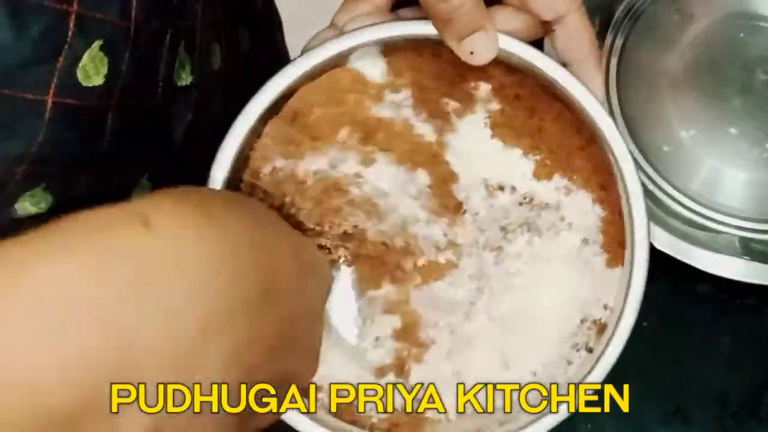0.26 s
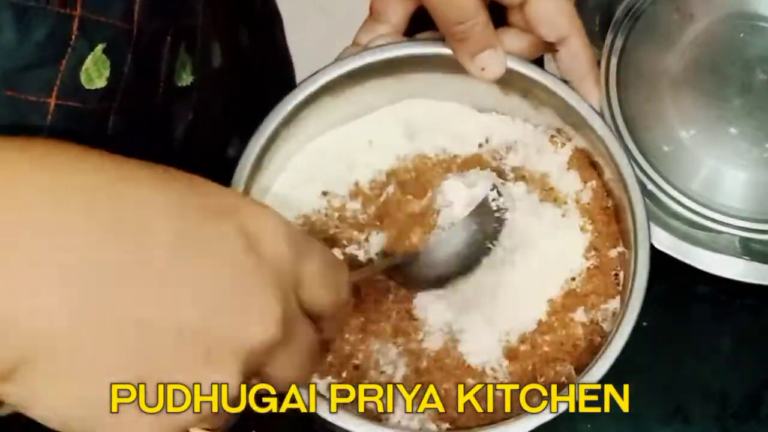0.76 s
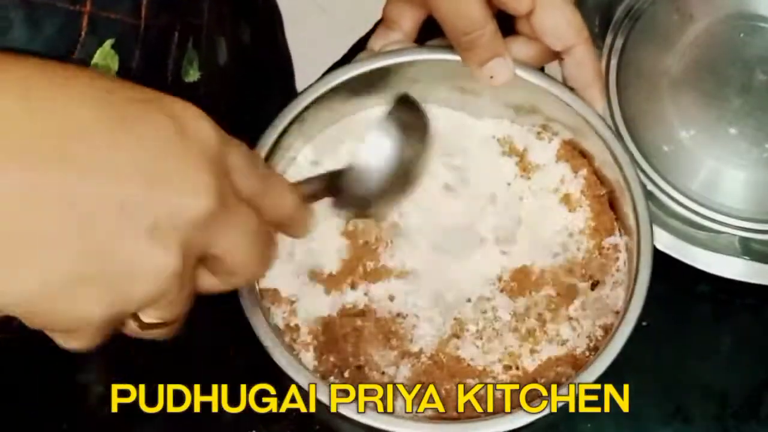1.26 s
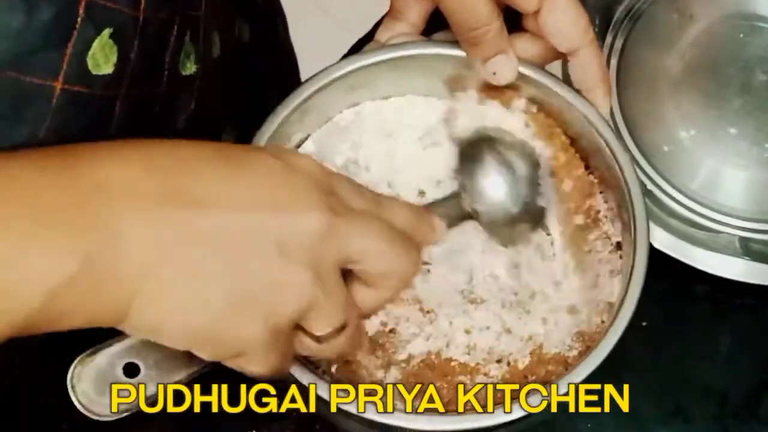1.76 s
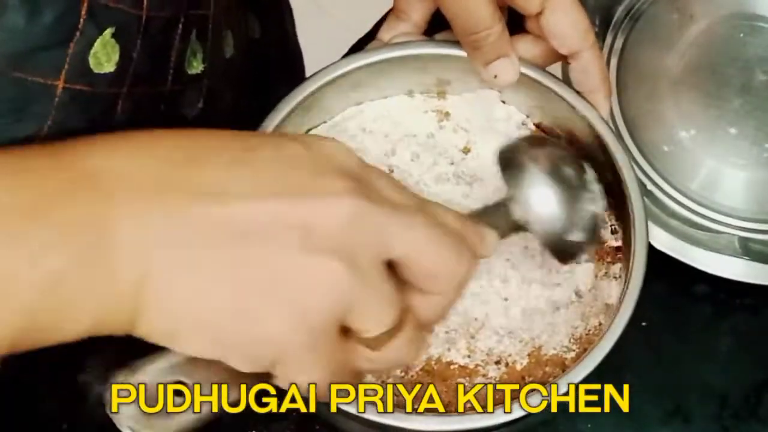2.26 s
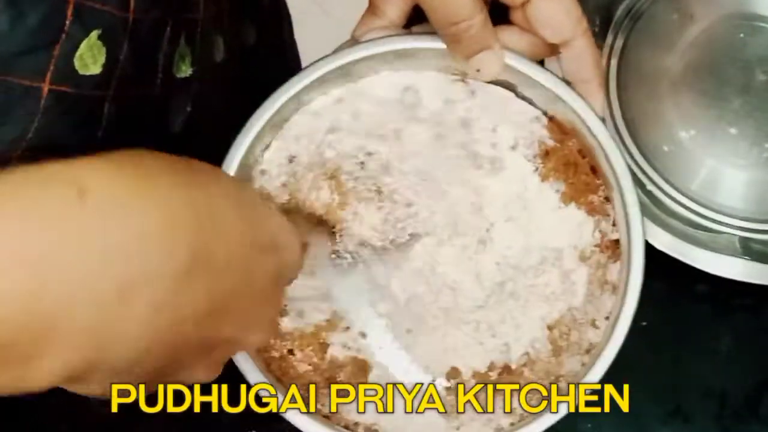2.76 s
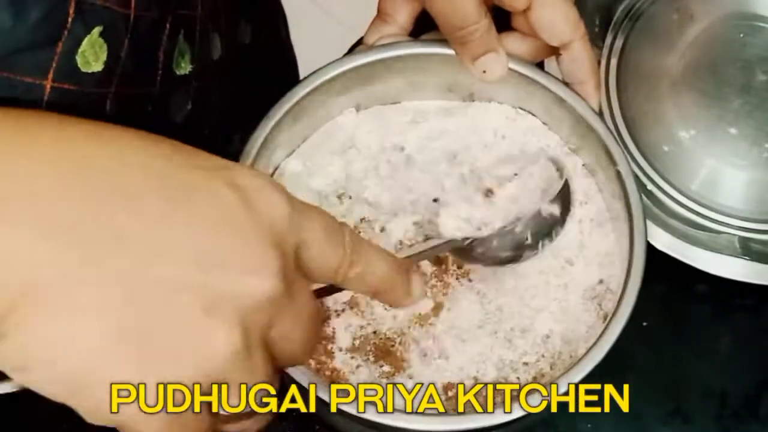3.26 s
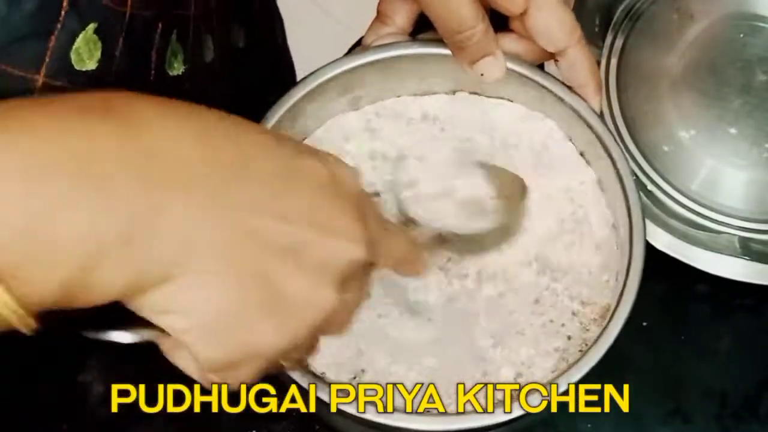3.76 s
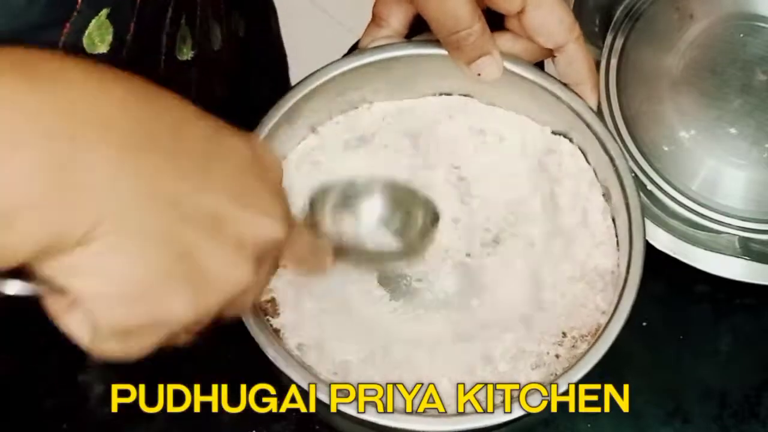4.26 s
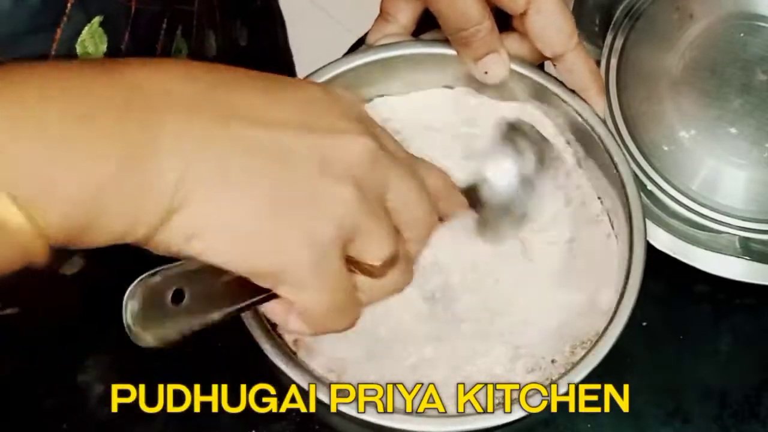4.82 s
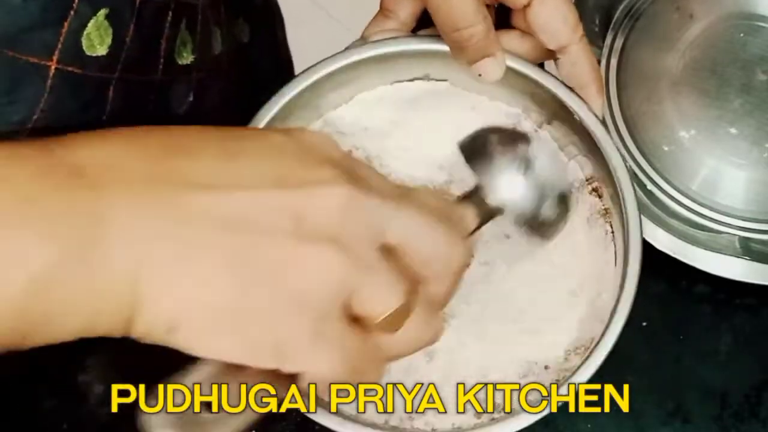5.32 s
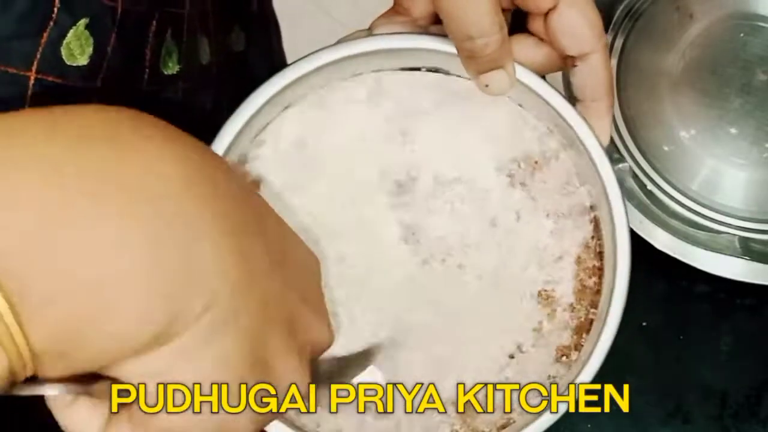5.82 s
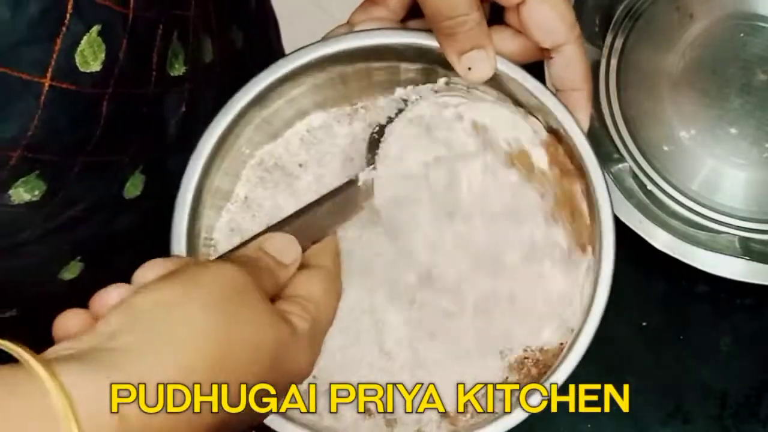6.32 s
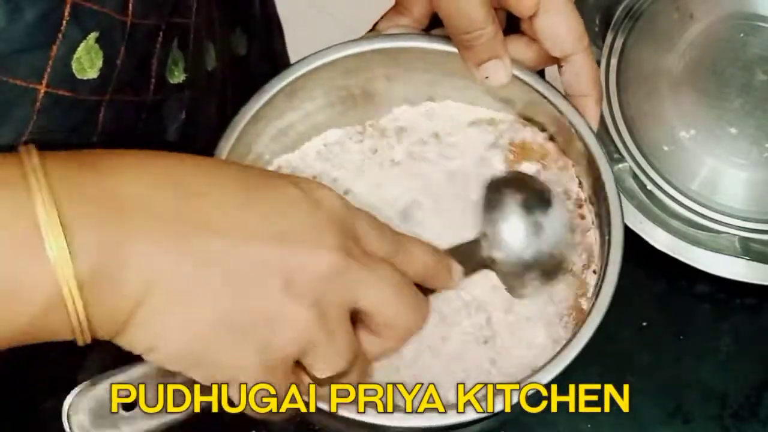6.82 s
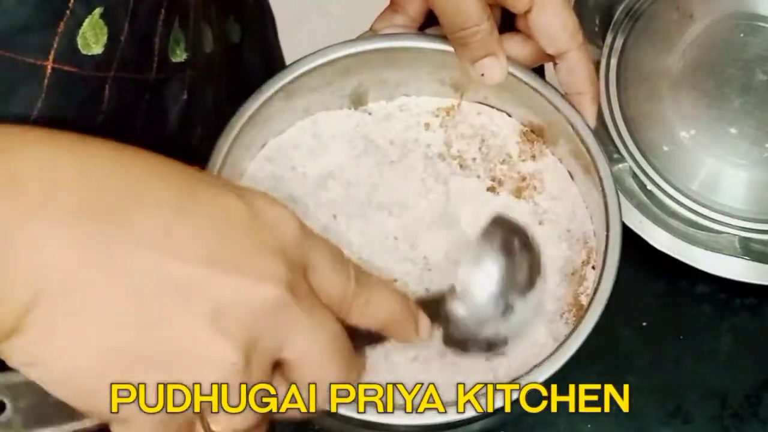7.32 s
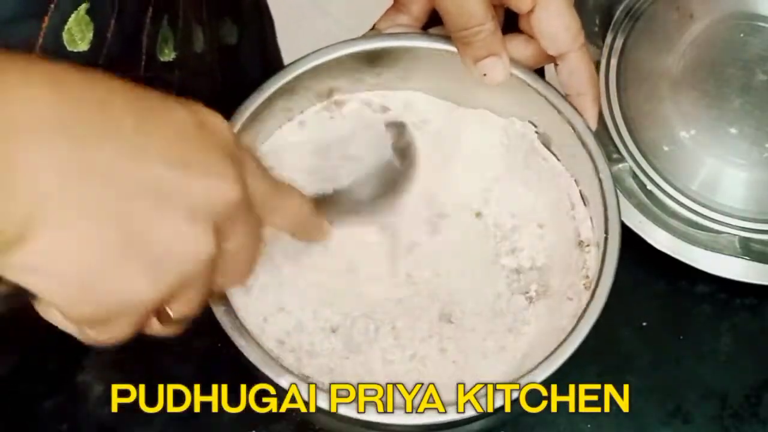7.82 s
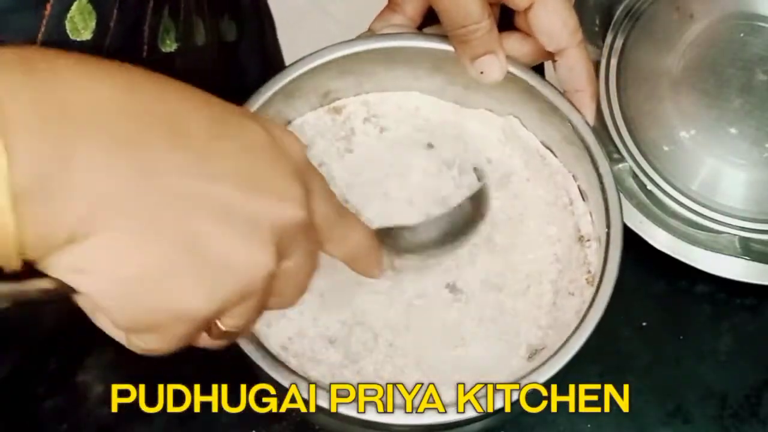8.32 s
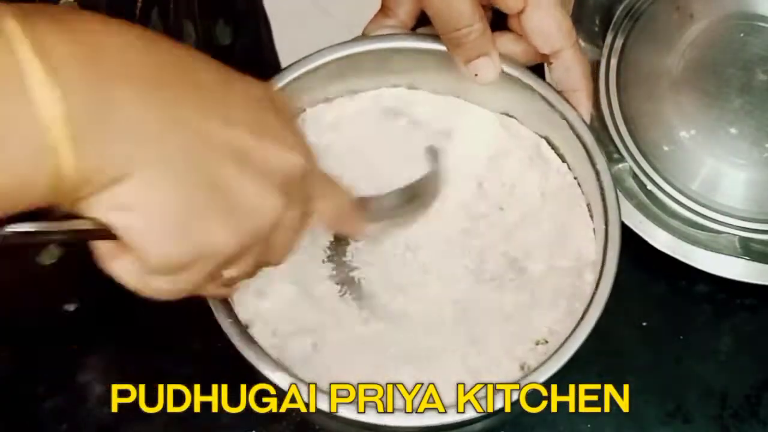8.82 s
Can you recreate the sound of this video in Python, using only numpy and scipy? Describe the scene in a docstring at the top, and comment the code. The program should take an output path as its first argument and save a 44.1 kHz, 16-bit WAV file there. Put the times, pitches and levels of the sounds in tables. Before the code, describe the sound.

A close stereo pickup in a small, hard kitchen. A low wavering hum runs throughout, beneath the hiss and crunch of dry flour sheared by a steel spoon in a hand-held steel pot. Soft bumps open at 0.15 and 0.26 s; at 0.4 s a clack comes with a hoarse skid gliding down. Short strokes follow, with sharp clacks at about 1.3, 1.6 and 1.8 s, some juddering. From 2.8 to 3.5 s a longer, stronger scraping sweep carries small clacks, and hard crumbs begin snapping. The loudest bright clanks strike at 3.9, 4.4 and 4.7 s, then after gentler swishing from 5 s, at 6.0 and 6.2 s. From 6.5 to 9 s, quick rhythmic gritty strokes continue with dull padded bumps, faint taps and occasional snaps. Rings are short and hand-damped, leaving a brief room tail.

```python
"""A steel spoon stirs dry flour mix in a hand-held steel pot, close by in a small hard-walled kitchen.
From the start a low, wavering hum lies under the hiss and crunch of sheared powder: shaped noise and a low sine.
Then the spoon bumps the padded bottom and clacks on the wall: noise cracks and damped modes, with room tails.
Early on it skids down in pitch once (gliding narrow noise); later it judders (random slips ring the pot).
From about 3 s hard crumbs snap now and then: short noise clicks that faintly ring the pot."""
import sys
import numpy as np
from scipy import signal
from scipy.fft import rfft, irfft, next_fast_len
from scipy.io import wavfile
from scipy.ndimage import uniform_filter1d, map_coordinates

SR = 44100
rng = np.random.default_rng(int(sys.argv[2]) if len(sys.argv) > 2 else 0)


def to_wav(s):
    """Save 16-bit WAV."""
    ch = np.atleast_2d(s).T  # columns
    pcm = np.round(np.clip(ch, -1, 1) * 32767)  # PCM
    wavfile.write(sys.argv[1], SR, pcm.astype(np.int16))


N = 400428

# edges of the contact registers (thud, bottom, wall, clink, shimmer): [f/Hz]
REGISTER_EDGES_HZ = [150, 350, 1100, 2400, 5600, 17000]
# spectrum of the dry crack of steel on steel: [f/Hz, density/dB]
CRACK_SPECTRUM = [(120, -2), (210, 4.5), (290, -1), (440, 9), (560, 12.5), (680, 9), (950, 5), (1130, 1.5),
                  (2400, 7.5), (3900, 11), (5000, 6.5), (6100, 1.5), (6650, 9), (7300, -2.5), (8000, -6.5),
                  (12000, -20.5), (15500, -19)]
# spectrum of sheared powder: [f/Hz, density/dB]
POWDER_SPECTRUM = [(300, -10), (700, 2.5), (1100, -6.5), (1600, -7.5), (2250, 6), (3200, 1), (3800, -4.5),
                   (5000, 2.5), (5700, -1.5), (6600, 3), (7300, -3), (8100, -18.5), (12000, -25.5),
                   (15500, -23)]


def amp(db):
    """Decibels to gain."""
    return 10 ** (np.asarray(db) / 20)


def unit(x):
    """Scale x to rms 1."""
    return x / np.sqrt(np.mean(x ** 2) + 1e-20)


def along(points, hz):
    """Interpolate (Hz, value) points on a log frequency axis."""
    f, v = np.transpose(points)
    return np.interp(np.log(hz + 1), np.log(f + 1), v)


def curves(rows):
    """Interpolate each column after the time to one value per sample."""
    s, *cols = np.transpose(rows)
    return [np.interp(np.arange(N) / SR, s, c) for c in cols]


def wobble(knots_per_s):
    """Smooth random curve through normally distributed knots."""
    knots = rng.standard_normal(int(N * knots_per_s / SR) + 4)
    return map_coordinates(knots, [np.arange(N) * knots_per_s / SR])


def filtered(x, response):
    """Multiply the spectrum of x by a response of frequency."""
    n = x.shape[-1]
    m = next_fast_len(n + 8192)
    spectrum = rfft(x, m) * response(np.fft.rfftfreq(m, 1 / SR))
    return irfft(spectrum, m)[..., :n]


def add(track, s, sound):
    """Mix a sound into the track at s seconds."""
    part = track[:, max(round(s * SR), 0):][:, :sound.shape[-1]]
    part += sound[..., :part.shape[-1]]


def spread(pair, spectrum):
    """Turn two unrelated signals into coloured stereo of rms 1; left-right likeness varies with frequency."""
    # stereo likeness: [f/Hz, left-right correlation]
    likeness = [(120, 0.99), (300, 0.88), (650, 0.59), (1400, 0.011), (3200, 0.017), (6800, 0.9),
                (15000, 0.44)]

    def response(hz):
        angle = np.arccos(np.clip(along(likeness, hz), -1, 1)) / 2
        return amp(along(spectrum, hz)) * [np.cos(angle), np.sin(angle)]

    mid, side = filtered(pair, response)
    return unit(np.array([mid + side, mid - side]))


def rush(spectrum, size=N):
    """Coloured stereo noise of rms 1."""
    return spread(rng.standard_normal((2, size)), spectrum)


def kitchen(x, build_s=0.00043):
    """Convolve x with a decaying-noise room tail of about unit energy; each frequency dies at its own speed."""
    # room decay: [f/Hz, t60/s]
    room_t60 = [(150, 0.8), (500, 0.59), (1400, 0.57), (3700, 0.5), (7000, 0.47), (14000, 0.3)]
    hz, t, z = signal.stft(rng.standard_normal((2, SR // 2)), SR, nperseg=256)
    fade = amp(-60 * t / along(room_t60, hz)[:, None]) * (1 - np.exp(-t / build_s))
    flat = [(1, 0)]
    tail = spread(signal.istft(z * fade, SR, nperseg=256)[1], flat)
    impulse = tail / np.sqrt(tail.shape[1])
    return signal.fftconvolve(np.atleast_2d(x), impulse, axes=1)[:, :x.shape[-1]]


def stirring(idle_hiss_db=-61, idle_rub_db=-56.5, rise_db_per_s=154, sag_db_per_s=3, release_db_per_s=126):
    """Spoon speed and pressure in dB: each sweep digs in, sags a little, dies away; the spoon never quite rests."""
    # sweeps through the mix: [up to speed at t/s, hold/s, relative hiss level/dB, relative rub level/dB]
    strokes = [(0.36, 0.051, -43.5, -53), (0.699, 0.027, -42.5, -58), (0.931, 0.088, -51, -69),
               (1.06, 0.041, -41.5, -63), (1.48, 0.079, -56, -50), (1.92, 0.2, -45.5, -46),
               (2.12, 0.11, -58.5, -45.5), (2.786, 0.737, -42, -43), (3.577, .2, -43, -44.5),
               (4.192, 0.025, -41.5, -43), (4.93, 0.13, -45.5, -50), (5.17, 0.5, -46.5, -60),
               (5.95, 0.016, -68, -47), (6.48, 0.059, -41.5, -50), (6.848, 0.066, -41.5, -51),
               (7.232, 0.044, -41.5, -43), (7.531, 0.033, -47, -50), (7.868, 0.057, -41, -45.5),
               (7.98, 0.28, -44, -53), (8.238, 0.085, -42, -45.5), (8.38, 0.077, -46, -48.5),
               (8.5, 0.2, -43.5, -47.5), (8.828, 0.33, -44, -51), (8.93, 0.033, -42, -42.5)]
    t = np.arange(N) / SR
    speed_db, pressure_db = np.full(N, idle_hiss_db), np.full(N, idle_rub_db)
    for s, held_s, hiss_db, rub_db in strokes:
        drop_db = rise_db_per_s * np.maximum(s - t, 0)
        drop_db = drop_db + sag_db_per_s * np.clip(t - s, 0, held_s)
        drop_db = drop_db + release_db_per_s * np.maximum(t - s - held_s, 0)
        speed_db = np.maximum(speed_db, hiss_db - drop_db)
        pressure_db = np.maximum(pressure_db, rub_db - drop_db)
    return speed_db, pressure_db


def background(hum_db=2.0, swell_db_per_db=0.11, tone_db=-1, tone_hz=66.0, air_db=-56):
    """Levelled noise hum that swells with the stirring, a wavering low sine, and still-air noise."""
    # hum: [t/s, relative level/dB]
    hum_levels = [(0.0, -51), (0.15, -45.5), (0.5, -42.5), (0.66, -54.5), (1.06, -40), (1.26, -54),
                  (1.41, -40.5), (1.51, -49.5), (1.95, -42.5), (3.16, -49.5), (4.5, -49), (5.84, -58),
                  (5.97, -49.5), (7.0, -52), (7.43, -60.5), (7.51, -49), (8.57, -52.5), (9.08, -49.5)]
    # low tone: [t/s, relative level/dB]
    tone_levels = [(0, -53), (0.4, -56), (1.15, -64.9), (1.5, -56), (2.05, -71.5), (3.1, -48), (3.6, -64),
                   (4.3, -47.5), (5.0, -54.5), (6.0, -50), (7.3, -69), (7.7, -62), (9.0, -64.5)]
    # hum spectrum: [f/Hz, density/dB]
    drone_spectrum = [(50, -21), (82, -11), (98, 3), (118, 10), (140, -1), (180, -7.5), (300, -46),
                      (900, -165)]
    # still-air spectrum: [f/Hz, density/dB]
    air_spectrum = [(20, -20), (60, -11), (150, -35), (320, -7), (600, -20.5), (1500, -6), (3500, -17),
                    (6500, -80), (8000, -78), (16000, -73)]
    drone = rush(drone_spectrum)
    power = uniform_filter1d(np.mean(drone ** 2, axis=0), size=SR // 8)
    steady_drone = drone / np.sqrt(np.abs(power) + 1e-6)
    speed_db, _ = stirring()
    swell_db = swell_db_per_db * (speed_db - speed_db.mean())
    hum = amp(curves(hum_levels)[0] + hum_db + swell_db) * steady_drone
    tone_phase = 2 * np.pi * np.cumsum(tone_hz + 1.45 * wobble(31)) / SR
    tone = np.sqrt(2) * np.sin(tone_phase)
    tone = amp(curves(tone_levels)[0] + tone_db + 0.43 * wobble(14)) * tone
    return hum + tone + amp(air_db) * rush(air_spectrum)


def ringing(t, rings, favour_octaves=0.078):
    """Sum the pot's damped modes at random strengths and phases; those near the favoured rings stand out."""
    # pot modes: [f/Hz, relative level/dB, t60/s]
    modes = [(210, -11, .22), (392, -3, .22), (432, -3, .25), (551, -2, .22), (750, -4, .2), (955, -1, .2),
             (1180, -9, .18), (1335, -9, .18), (1525, -8, .18), (1700, -5, .2), (1785, -6, .2),
             (2060, -3, .2), (2106, -3, .2), (2190, -5, .2), (2280, -5, .2), (2568, -1, .24),
             (2630, -3, .22), (2738, -4, .2), (3040, -4, .24), (3128, -4, .22), (3255, -4, .3),
             (3372, -2, .24), (3623, -2, .26), (3770, -7, .2), (4150, -5, .24), (4330, -4, .28),
             (4463, -4, .28), (4640, -6, .2), (4930, -4, .2), (5060, -3, .22), (5150, -5, .2),
             (6002, -6, .18), (6497, -1, .24), (6608, 0, .22), (6730, -2, .22), (7040, -8, .18)]
    hz, db, t60 = np.transpose(modes)[:, :, None]
    favour_db = np.sum([lift_db * np.exp(-(np.log2(hz / ring_hz) / favour_octaves) ** 2)
                        for ring_hz, lift_db in rings], axis=0)
    strength_db = db + favour_db + 2.5 * rng.standard_normal(hz.shape)
    # grip and spoon contact shift each mode a little
    hz = hz + 9 * rng.standard_normal(hz.shape)
    phase = 2 * np.pi * rng.random(hz.shape)
    early = t[:SR // 4]
    decay = amp(strength_db - 60 * early / t60)
    ring = np.sum(decay * np.sin(2 * np.pi * hz * early + phase), axis=0)
    return np.pad(ring, (0, len(t) - len(early)))


def pot_answer(t):
    """The pot's ring after a light touch, at peak 1; no mode is favoured."""
    ring = ringing(t, [(1, 0)])
    return ring / np.abs(ring).max()


def grains(per_s, t60_s, range_db):
    """Crumbs catching under the spoon: tiny damped pings of random time, pitch and size."""
    t = np.arange(SR // 80) / SR
    when, pitch, size = rng.random((int(per_s * N / SR), 3)).T[:, :, None]
    decay = amp(-range_db * size - 60 * t / t60_s)
    pings = decay * np.sin(2 * np.pi * (700 + 6500 * pitch) * t)
    samples = (when * N + t * SR).astype(int)
    return np.bincount(samples.ravel(), pings.ravel(), N)[:N]


def patchy(x, depth_db):
    """Brief random swells, each a few hundred Hz wide."""
    z = signal.stft(x, nperseg=512)[2]
    field = uniform_filter1d(rng.standard_normal(z.shape[1:]), size=4, axis=0)
    field = uniform_filter1d(field, size=6, axis=1)
    gain = unit(amp(depth_db * unit(field)))
    return signal.istft(z * gain, nperseg=512)[1][:, :N]


def flour(crunch_db=-5, singing_db=-8, hiss_db=-1.5, rub_db=0, rasp_db=-44, rasp_growth=3.0):
    """Powder shears round the spoon as hiss with cracking crumbs; the edge rasps, the drag rubs the bottom."""
    # rub on the pot's bottom: [f/Hz, density/dB]
    bottom_spectrum = [(90, -28), (170, -2.5), (212, 3), (270, -4), (340, 0), (580, -3), (720, -1),
                       (1000, -5.5), (2000, 0), (5000, -36)]
    # rasp of the steel edge: [f/Hz, density/dB]
    rasp_spectrum = [(600, -41), (1400, -11.5), (2200, 2.5), (2600, 0), (2850, -4.5), (3250, 0.5),
                     (3800, -11), (7000, -35.5)]
    speed_db, pressure_db = stirring()
    drag = wobble(35)  # the mix packs and gives way
    crumbs = grains(per_s=420, t60_s=0.005, range_db=26) * amp(3 * wobble(28))
    crunch = spread(np.array([crumbs, -.4 * crumbs]), POWDER_SPECTRUM)
    shear = unit(rush(POWDER_SPECTRUM) + amp(crunch_db) * crunch)
    # grains keep the pot's modes faintly singing
    answer = pot_answer(np.arange(SR // 4) / SR)
    singing = unit(signal.fftconvolve(shear, answer[None], axes=1)[:, :N])
    hiss = unit(shear + amp(singing_db) * singing) * amp(speed_db + hiss_db + 0.9 * drag)
    # rasp grows faster than hiss with speed
    rasp_level_db = rasp_db + rasp_growth * (speed_db + 43.0) + 2.05 * wobble(260)
    rasp = rush(rasp_spectrum) * amp(rasp_level_db)
    rub = rush(bottom_spectrum) * amp(pressure_db + rub_db + 1.8 * drag)
    # colour shifts as the spoon meets loose powder and lumps
    return patchy(hiss + rasp + rub, depth_db=1.3)


def register_levels(colour_db, strength_db, brightness_db_per_octave, thud_db, ring_hz,
                    spot_db=5.5, spot_octaves=0.54):
    """Register levels in dB: colour tilted by brightness, lifted near the favoured ring, thud added lowest."""
    centres = np.sqrt(np.multiply(REGISTER_EDGES_HZ[:-1], REGISTER_EDGES_HZ[1:]))
    tilt = brightness_db_per_octave * np.log2(centres / np.median(centres))
    spot = spot_db * np.exp(-(np.log2(centres / ring_hz) / spot_octaves) ** 2)
    thud = thud_db * (centres == centres.min())
    return strength_db + np.asarray(colour_db) + tilt + spot + thud


def clack(levels_db, rings, room_db, sizzle_db, crack_s=0.02, clatter_db=-17, clatter_s=0.16,
          sizzle_hz=8000, ring_db=-19.5, ring_growth=0.33, sharpness=9, wet_db=-0.5, near_db=2.0):
    """One contact: a crack, a brief clatter of the spoon and the pot's modes, weighted by register."""
    t = np.arange(SR * 2 // 3) / SR
    # a glancing tap is brief and barely stirs the room
    crack_t60_s = crack_s * amp(0.13 * min(room_db, 0))
    decay = amp(-60 * t / crack_t60_s) + amp(clatter_db - 60 * t / clatter_s)
    crack = rush(CRACK_SPECTRUM, size=len(t)) * decay
    # sizzle shelf at the very top
    crack = filtered(crack, lambda hz: amp(sizzle_db * hz ** 16 / (hz ** 16 + float(sizzle_hz) ** 16)))
    # each spot brings out its own clusters of modes
    for hz, lift_db in rings:
        peak = signal.lfilter(*signal.iirpeak(hz, sharpness, fs=SR), crack)
        crack = crack + (amp(lift_db) - 1) * peak
    # bare steel rings; flour padding leaves little shimmer and ring
    ring = amp(ring_db + ring_growth * (levels_db[-1] + 7.0)) * ringing(t, rings)
    direct = (crack + ring) * (1 - np.exp(-t / .0005))
    # pot nearer the right: left is softer and 0.18 ms later
    left = amp(-near_db) * np.interp(t - .00018, t, direct[0], left=0)
    right = amp(near_db) * direct[1]
    heard = np.array([left, right]) + amp(wet_db + room_db) * kitchen(direct)
    blow = np.zeros_like(heard)
    for lo, hi, level_db in zip(REGISTER_EDGES_HZ, REGISTER_EDGES_HZ[1:], levels_db):
        sos = signal.butter(N=3, Wn=[lo, hi], btype="band", fs=SR, output="sos")
        band = signal.sosfilt(sos, heard)
        blow += amp(level_db) * band / np.std(band[:, :SR // 40])  # level set by the first 25 ms
    return blow


def spoon(bump_ring_db=9, bump_room_db=3):
    """Contacts with the flour-padded bottom and the bare wall; the hand damps the pot, so the room carries on."""
    # bumps: [t/s, relative strength/dB, brightness/(dB/octave), thud/dB, favoured ring f/Hz]
    bumps = [(0.152, -38.5, 1.5, 10, 517), (0.257, -44, -1, 4.5, 583), (0.96, -42, 1, 11.5, 615),
             (2.417, -44, -2.4, -4.5, 2240), (2.603, -46.5, -4.5, 2.5, 534), (4.583, -38, -2.5, 0, 464),
             (6.848, -44.5, -3, -5.5, 594), (7.513, -44.5, 1, 7, 247), (7.572, -41.5, -1.5, 3.5, 560),
             (7.793, -41.5, -1, 1.5, 2260), (8.302, -40.5, -1, 7.5, 520), (8.493, -45, -0.5, 6, 496),
             (8.659, -47, -2.5, 4.5, 537), (8.822, -49, -2, 2, 408), (9.001, -52, -3.5, 2.5, 212)]
    # bump colour: [relative level/dB] per register
    padded_db = (-4.5, -3.5, -4, -8.5, -10.5)
    # clacks: [t/s, relative strength/dB, brightness/(dB/octave), thud/dB, relative room/dB, sizzle/dB,
    # favoured rings, main first: (f/Hz, lift/dB)]
    clacks = [(0.384, -40, -1, 9.5, -0.5, -1, [(1300, 11), (1820, 8), (216, 11)]),
              (1.013, -35, -1.5, 7, -1.5, -3, [(660, 12.5)]), (1.121, -47, 1, -14, -2.5, -13, [(3030, 8)]),
              (1.285, -27.5, -1, 3.5, -2.5, 17, [(395, 10.5), (5060, 4), (6002, 6), (7000, 12)]),
              (1.344, -33.5, 4, 18, 0.5, 0, [(4260, 18), (3780, 6), (464, 12)]),
              (1.607, -27.5, 1, -1, 5.5, 3.5, [(2800, 3), (3600, 0.5), (3200, 4), (7200, 5.5)]),
              (1.816, -28, 1.4, -2, 3.5, -1, [(1554, 13), (2100, 3.5), (3260, 16.5), (4700, 13),
              (410, -16)]), (2.926, -36.5, 2.5, 10.5, 2.5, 4.5, [(3450, 9), (4950, 10.5)]),
              (2.98, -43, 0.5, 4, -8, 0, [(2250, 26)]), (3.053, -40.5, 0.5, -1, -2, -5, [(2380, 28)]),
              (3.943, -23.5, -0.05, -1.5, 6, 9.5, [(2000, 4.5), (1700, 5), (2680, 7), (6810, 10.5)]),
              (4.441, -23.5, -0.35, 2, -2.5, 2.5, [(6800, 5), (930, 7.5), (4930, 7), (430, 6), (3940, -3)]),
              (4.724, -25.5, -3, -8.5, -1, 7, [(3372, 3.5), (955, 7), (2600, 4.5), (3600, 0), (6608, 7),
              (416, 9)]), (5.128, -46.5, 4, -10, -2.5, -4, [(4870, 13), (3160, 16)]),
              (6.03, -25.5, -3.5, -9.5, 0, 10, [(1800, 7.5), (2540, 6.5), (750, 6.5), (990, 4.5), (5160, 7),
              (6600, 12), (490, 6)]), (6.158, -28, 0.3, 9, -4, -4, [(1250, 5), (5000, 5.5)]),
              (6.458, -38, -0.5, -6, 5.5, 1, [(3050, 7.5), (4950, 7)]),
              (6.833, -43, -0.5, -1, -10, -16, [(1850, 4.5)]),
              (7.531, -41.5, -1, -7, -2.5, -3, [(2300, -5)])]
    # clack colour: [relative level/dB] per register
    bare_db = (-11, 0.24, .5, 3, -1)
    track = np.zeros((2, N))
    for s, *blow, ring_hz in bumps:
        levels_db = register_levels(padded_db, *blow, ring_hz)
        add(track, s, clack(levels_db, [(ring_hz, bump_ring_db)], bump_room_db, sizzle_db=-5))
    for s, *blow, room_db, sizzle_db, rings in clacks:
        main_ring_hz = rings[0][0]
        levels_db = register_levels(bare_db, *blow, main_ring_hz)
        add(track, s, clack(levels_db, rings, room_db, sizzle_db))
    return track


def skid(start_s=0.386, width_knots_per_s=300, wet_db=-3):
    """The spoon skids along the wall: a hoarse, narrow noise band that glides down and fades."""
    # skid: [relative level/dB, first pitch f/Hz, pitch sag/(Hz/s), t60/s]
    glide = (-37.5, 1341, 894, 0.26)
    db, hz, sag_hz_per_s, t60 = glide
    t = np.clip(np.arange(N) / SR - start_s, 0, 1)
    phase = 2 * np.pi * (hz * t - sag_hz_per_s * t ** 2 / 2)
    in_phase = wobble(width_knots_per_s) * np.cos(phase)
    quadrature = wobble(width_knots_per_s) * np.sin(phase)
    note = unit(in_phase + quadrature)
    direct = note * amp(db - 60 * t / t60) * (1 - np.exp(-t / .003))
    return direct + amp(wet_db) * kitchen(direct)


def judder(slips_per_s=450, favoured_hz=2740, favoured_db=5, wet_db=-6.5, level_db=-5, ring_db=-2):
    """The spoon's edge skips along the steel in quick random slips that keep the pot ringing."""
    # judders: [t/s, length/s, relative level/dB]
    judders = [(1.063, 0.067, -43), (1.61, 0.0057, -20), (1.836, 0.058, -31.5), (3.952, 0.02, -26),
               (4.725, 0.032, -24), (6.029, 0.043, -32)]
    force = np.zeros((2, N))
    for s, length_s, db in judders:
        n = int(length_s * SR)
        slips = (rng.random(n) < slips_per_s / SR) + 0.012 * rng.standard_normal((2, n))
        add(force, s, amp(db + level_db) * unit(slips * signal.windows.tukey(n)))
    answer = ringing(np.arange(SR // 4) / SR, [(favoured_hz, favoured_db)])
    ring = unit(signal.fftconvolve(force[0], answer)[:N])
    direct = (spread(force, CRACK_SPECTRUM) + amp(ring_db) * ring) * np.std(force)
    return direct + amp(wet_db) * kitchen(direct)


def snaps(click_t60_s=0.013, ring_db=-24, wet_db=-3):
    """Hard crumbs snap between spoon and pot: dry noise clicks that faintly ring the pot."""
    # snaps: [t/s, click peak level/dB before ring and room]
    crumb_snaps = [(3.018, -17.5), (3.253, -28), (3.403, -28), (3.589, -31), (3.705, -29), (3.785, -30),
                   (5.129, -23), (7.08, -35), (7.891, -27), (8.247, -33), (8.303, -32), (8.621, -32),
                   (8.919, -29)]
    track, t = np.zeros((2, N)), np.arange(SR // 8) / SR
    for s, db in crumb_snaps:
        click = rush(POWDER_SPECTRUM, size=len(t)) * amp(-60 * t / click_t60_s)
        click = click / np.abs(click).max() + amp(ring_db) * pot_answer(t)
        add(track, s, amp(db) * click)
    return track + amp(wet_db) * kitchen(track)


def scene():
    """Sum of background, flour, spoon contacts, skid, judders and snaps."""
    return background() + flour() + spoon() + skid() + judder() + snaps()


def record(dry, ceiling=0.93, top_hz=16100):
    """Left and right favour different bands; peaks round off below the ceiling; nothing passes above top_hz."""
    # stereo lean: [f/Hz, left minus right/dB]
    lean = [(150, 0.5), (700, -1), (1300, -2), (2400, -3), (4400, -10.5), (6500, -5.5), (8500, 0.5),
            (13000, 2.5)]
    heard = filtered(dry, lambda hz: amp(np.outer([.5, -.5], along(lean, hz))))
    rounded = heard / (1 + np.abs(heard / ceiling) ** 6) ** (1 / 6)
    return filtered(rounded, lambda hz: hz < top_hz)


dry = scene()
out = record(dry)
to_wav(out)
```